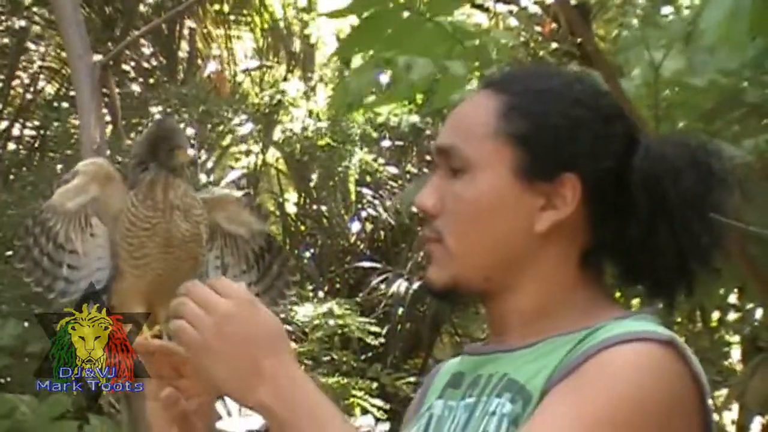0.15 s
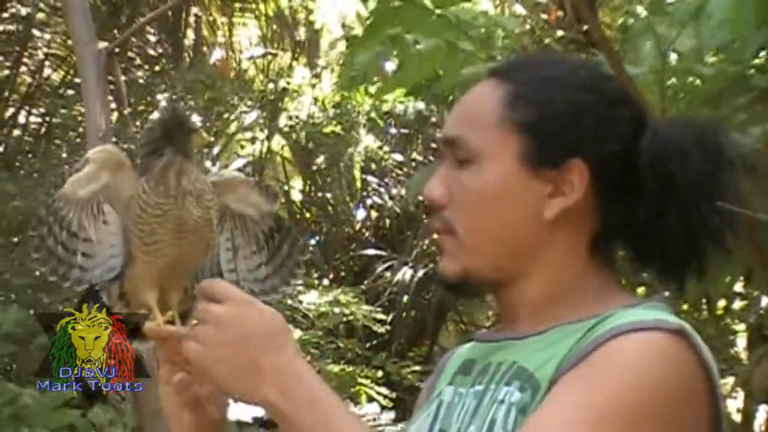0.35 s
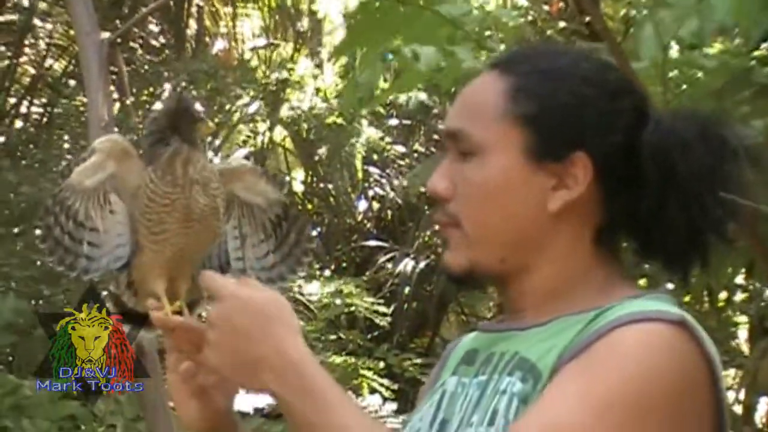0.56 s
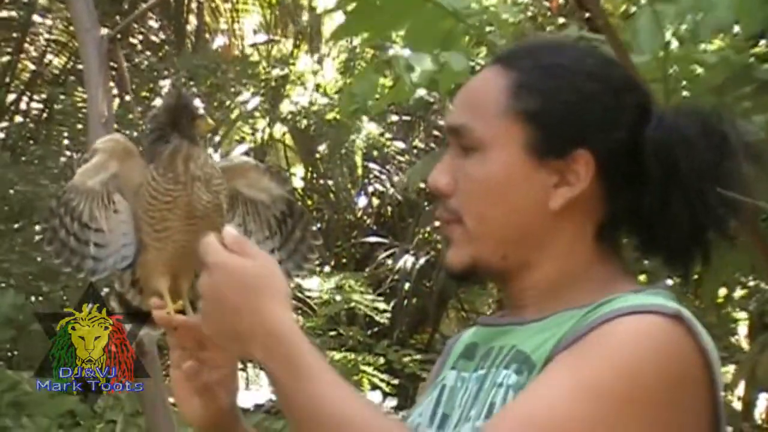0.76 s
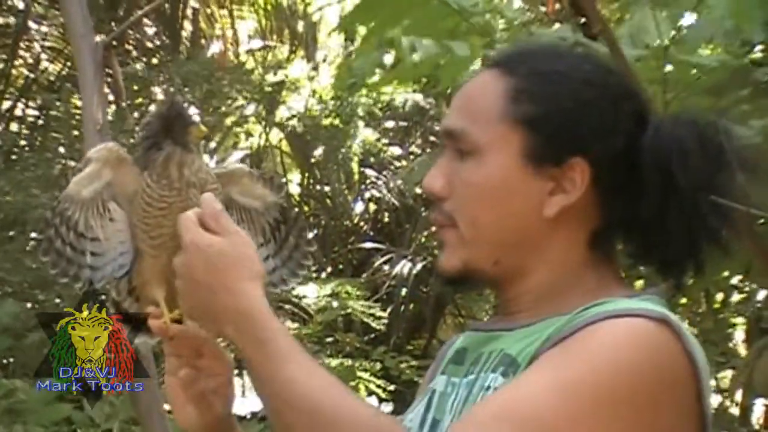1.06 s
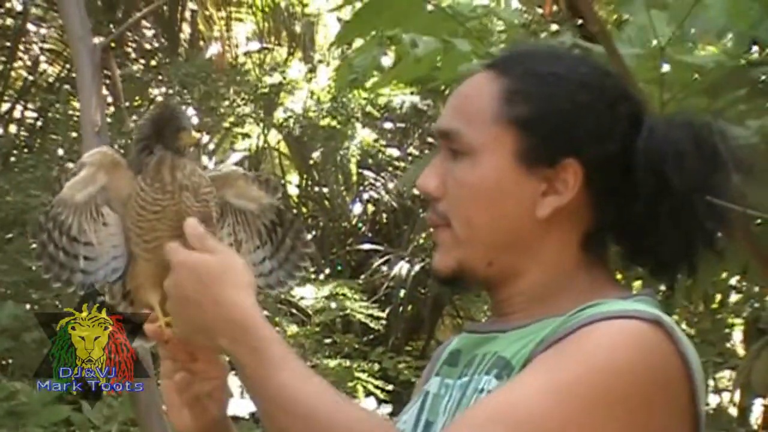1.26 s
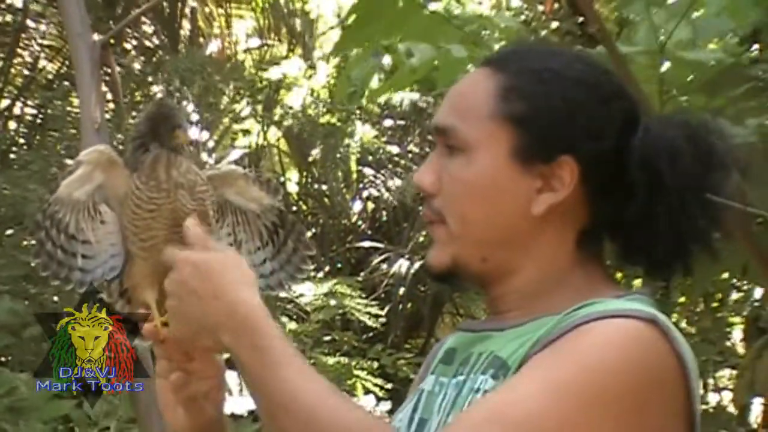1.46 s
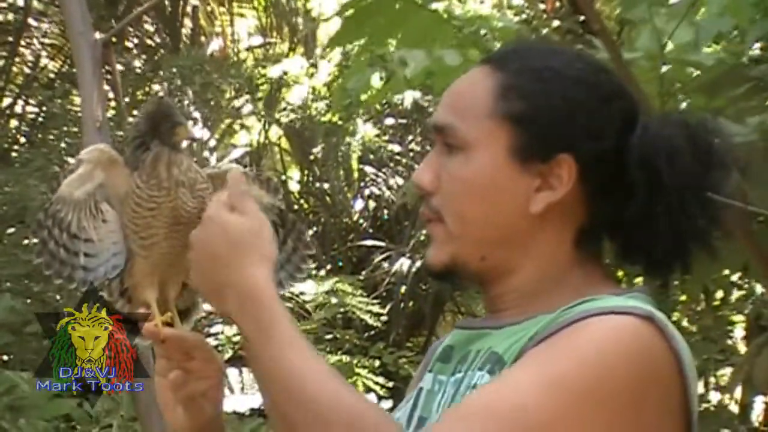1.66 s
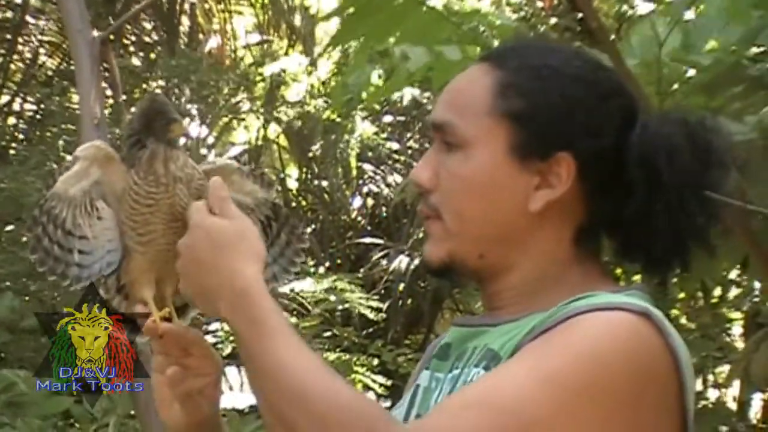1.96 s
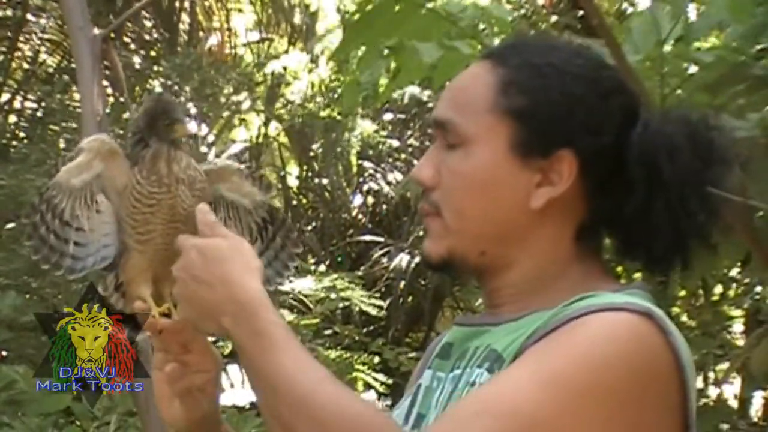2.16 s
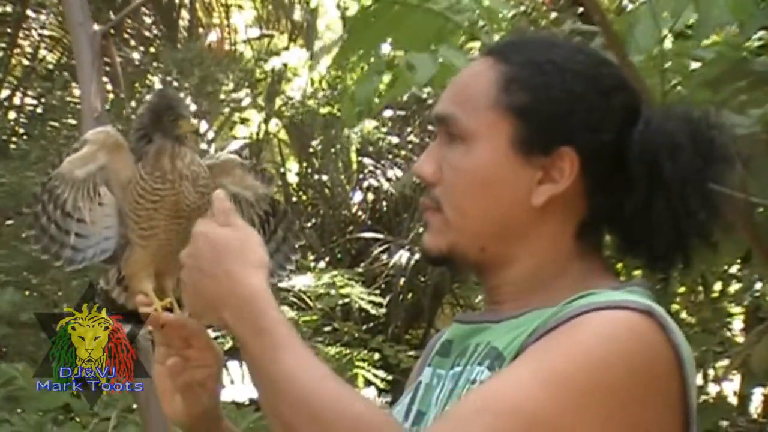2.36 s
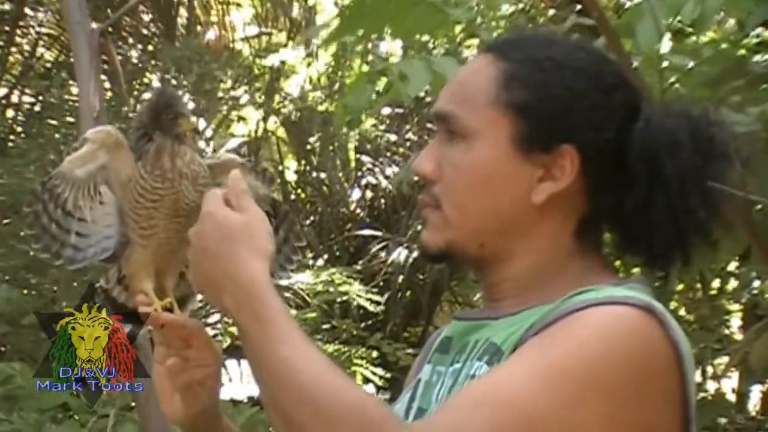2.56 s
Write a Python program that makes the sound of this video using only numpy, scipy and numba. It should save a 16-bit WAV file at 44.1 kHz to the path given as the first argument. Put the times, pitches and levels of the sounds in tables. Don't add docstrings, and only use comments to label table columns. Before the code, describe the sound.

One hoarse, piercing hawk scream drops in pitch over soft insect hiss and faint small birds

```python
import sys
import numpy as np
from scipy import signal
from scipy.fft import rfft, irfft
from scipy.io import wavfile
from scipy.ndimage import uniform_filter1d
from numba import njit

SR = 44100
rng = np.random.default_rng(int(sys.argv[2]) if len(sys.argv) > 2 else 0)


def level_to_linear(level):
    exponent = np.asarray(level, float) / 20
    return 10 ** exponent


def dump(signal):
    limited = np.clip(np.atleast_2d(signal).T, -1, 1)
    pcm = np.round(limited * 32767).astype(np.int16)
    wavfile.write(sys.argv[1], SR, pcm)


N = 119070
PORTS = np.array([[1], [-1]])


def level(x, db):
    return x * level_to_linear(db) / np.sqrt(np.mean(x ** 2))


def on_hz(table, hz):
    f, value = np.array(table).T[:2]
    return np.interp(np.log(hz + 1), np.log(f), value)


@njit
def svf(x, hz, width):
    y, b, l = np.empty(len(x)), 0., 0.
    for i in range(len(x)):
        g, k = np.tan(np.pi * hz[i] / SR), width / hz[i]
        v = (b + g * (x[i] - l)) / (1 + g * (g + k))
        b, l, y[i] = 2 * v - b, l + 2 * g * v, k * v
    return y


def band(x, hz, width):
    hz = hz + np.zeros(len(x))
    return svf(svf(x, hz, 1. * width), hz, 1. * width)


def walk(rate):
    k = max(int(SR / rate), 1)
    steps = np.repeat(rng.standard_normal(N // k + 1), k)
    return 1.44 * uniform_filter1d(uniform_filter1d(steps, k), k)[:N]


def bursts(table):
    out = np.zeros(N)
    for s, length, from_hz, to_hz, width, db in table:
        noise = rng.standard_normal(N // 8)
        a, n = max(int(s * SR), 0), int(length * SR)
        note = level(band(noise[:n], np.linspace(from_hz, to_hz, n), width), db)
        out[a:a + n] += note * np.sin(np.linspace(0, np.pi, n)) ** .7
    return out


# f/Hz, side to mid ratio/1
UNLIKE = [(60, 0.34), (130, 1), (300, 0.25), (1300, 0.35), (6000, 0.26), (9000, 0.61)]


def hiss(hz, width):
    f = np.fft.rfftfreq(N, 1 / SR)
    resonance = 1 + ((f - hz) * 2 / width) ** 2
    mid, side = irfft(rfft(rng.standard_normal((2, N))) / resonance, N)
    return mid + on_hz(UNLIKE, hz) * side * PORTS


# f/Hz, spectral level/dB
AIR = [(18, -65), (30, -22), (296, -17), (495, -5.5), (941, 1.5), (2200, -11), (7750, -13), (11700, -36),
       (14000, -79)]
# f/Hz, width/Hz, level/dB
INSECTS = [(3100, 1170, -51), (5285, 1020, -54), (7600, 1900, -50.5)]


def garden():
    swell = walk(1.8)
    air = 0
    for hz in 35 * 2 ** np.arange(0, 8.8, .5):
        flicker = 0.1 * swell + 1.04 * walk(9.16)
        air = air + level_to_linear(on_hz(AIR, hz) + flicker) * hiss(hz, hz * 0.58)
    insects = 0
    for hz, width, db in INSECTS:
        insects = insects + level_to_linear(0.91 * walk(8.5)) * level(hiss(hz, width), db)
    return level(air, -43) + insects


# t/s, length/s, start f/Hz, end f/Hz, width/Hz, level/dB
BUMPS = [
    (1.97, 0.11, 40, 35, 40, -61),
    (2.37, 0.15, 50, 40, 50, -57),
    (0.08, 0.135, 150, 105, 87, -63),
]


def hand_bumps():
    return bursts(BUMPS)


# t/s, length/s, start f/Hz, end f/Hz, width/Hz, level/dB
CHIRPS = [
    (0, 0.058, 6700, 7260, 3480, -42),
    (.06, 0.1, 7850, 7660, 300, -41),
    (.16, 0.078, 9140, 9300, 300, -52),
    (.29, 0.064, 9200, 6340, 1500, -40.5),
    (.3, .15, 8200, 7300, 2200, -53),
    (.46, 0.11, 7940, 7600, 500, -50.5),
    (.32, 0.051, 510, 503, 29.7, -48.5),
    (2.14, .14, 1013, 994, 40, -48.5),
    (2.14, 0.056, 816, 816, 40, -50),
]


def small_birds():
    return bursts(CHIRPS)


# t/s, f/Hz, level/dB
WHISTLE = [
    (1.16, 3404, -51),
    (1.201, 3713, -41),
    (1.24, 3803, -62),
    (1.285, 3770, -49),
    (1.399, 3200, -50.5),
    (1.449, 2990, -45.5),
    (1.51, 2960, -45),
    (1.6, 2740, -57),
    (1.64, 2620, -68),
]


def far_whistle(t):
    s, hz, db = np.array(WHISTLE).T
    pitch = uniform_filter1d(np.interp(t, s, hz), size=1200)
    strength = np.interp(t, s, db, -120, -120) + 2.5 * walk(35.4)
    return 1.6 * level_to_linear(strength) * np.sin(2 * np.pi * np.cumsum(pitch) / SR)


# t/s, length/s, start f/Hz, end f/Hz, width/Hz, level/dB
RASPS = [
    (1.845, 0.042, 2800, 3770, 497, -39),
    (1.88, 0.048, 2400, 4370, 2600, -39),
    (2.49, 0.049, 3300, 3100, 700, -34),
]


def hoarse_air():
    return bursts(RASPS)


def beak_click():
    after = np.clip(t_axis() - 1.8755, 0, 1)
    decay_s = .00008
    click = level_to_linear(-9) * (after > 0) * np.exp(-after / decay_s) * (1 + 0.35 * rng.standard_normal(N))
    low, middle, high = band(click, 1300., 1800.), band(click, 4000., 1500.), band(click, 11000., 11500.)
    return low + 0.83 * middle + 1.3 * high


def t_axis():
    return np.arange(N) / SR


# t/s, f/Hz, effort level/dB, breath share/dB, loss per harmonic as the beak closes/dB
SCREAM = [
    (1.862, 900, -39, -3, -1.5),
    (1.9, 1222, -34, -5, -2.5),
    (1.94, 1629, -17.5, -14.5, 2.5),
    (2.012, 1785, -18, -19, -0.7),
    (2.07, 1685, -20.5, -14, 2),
    (2.125, 1456, -22, -18, 0),
    (2.27, 1275, -28, -24.5, 0.1),
    (2.465, 1166, -27, -32, 4),
    (2.503, 1054, -28.5, -16, 0),
]
# t/s, length/s, level/dB
PUSHES = [
    (2.02, 0.0068, 0.5),
    (2.028, 0.0026, -4),
    (2.048, 0.0058, 2),
    (2.275, 0.0068, -2.5),
    (2.315, .018, 4.5),
    (2.349, 0.01, -6.5),
    (2.396, 0.02, 6.5),
    (2.416, 0.0042, -9),
    (2.467, 0.0051, -19),
    (2.475, .006, 8.5),
]


def syrinx(t):
    s, hz, db, breath_db, dull_db = np.array(SCREAM).T

    def smooth(values):
        return uniform_filter1d(np.interp(t, s, values), size=600)

    breath, closing = smooth(breath_db), smooth(dull_db)
    rough = np.clip(level_to_linear(breath + 16.5), .3, 1.2)
    pitch = smooth(hz) * (1 + 0.0038 * rough * walk(150))
    phase = 2 * np.pi * np.cumsum(pitch) / SR
    not_yet_full = np.clip((s[2] - t) / .05, 0, 1)
    voice = 0
    for k in range(1, 12):
        shimmer_db = 3.8 * rough * walk(140)
        beak_loss_db = max(k - 3, 0) * np.clip(closing, 0, 4)
        late_loss_db = 4.5 * max(k - 6, 0) * not_yet_full
        voice = voice + np.cos(k * phase) * level_to_linear(shimmer_db - beak_loss_db - late_loss_db)
    puffs = 1.8 * (1 + np.cos(phase))
    air = level_to_linear(breath) * puffs * rng.standard_normal(N)
    fade_s = 0.016
    gate = np.clip(np.minimum(t - s[0], s[-1] - t) / fade_s, 0, 1)
    push_db = sum(g * np.exp(-.5 * ((t - at) / length) ** 2) for at, length, g in PUSHES)
    return (voice + air) * gate * level_to_linear(smooth(db) + 0.5 + push_db), closing


# f/Hz, width/Hz, level/dB
THROAT = [(1263, 300, -17.5), (2600, 600, -19), (3340, 578, 0.66), (5130, 660, -19), (7470, 1090, -11),
          (8940, 920, -22.5), (10930, 2700, -26)]


def throat(source, closing):
    out = 0
    for k, (hz, width, db) in enumerate(THROAT):
        out = out + (-1) ** k * level_to_linear(db) * band(source, hz * (1 + 0.015 * closing), width * 1.284)
    return out


def hawk(t):
    return throat(*syrinx(t)) + beak_click() + hoarse_air()


def trees(x):
    t = np.arange(SR // 2) / SR
    t60_s, gap_s = 0.44, .012
    mid, side = rng.standard_normal((2, len(t))) * level_to_linear(-60 * t / t60_s) * (t > gap_s)

    def echo(response):
        return signal.fftconvolve(x, level(response, -4) / np.sqrt(len(t)))[:N]

    return x + echo(mid) + 0.24 * echo(side) * PORTS


def scene():
    t = t_axis()
    calls = hawk(t) + far_whistle(t) + small_birds()
    return trees(calls) + garden() + hand_bumps()


# f/Hz, level difference/dB
LEFT_DB = [(80, 2), (170, 12.5), (670, 7), (1220, 4.5), (4090, 3), (9000, 1.5)]
# f/Hz, phase/rad
LEADS = [(70, 2.6), (200, 1.0), (700, 0.33), (2000, 0.08), (6500, 0.09), (8500, -1.3), (13800, -0.5)]
# f/Hz, level/dB
MIC = [(30, -6), (70, 1), (150, 1), (9500, 0.5), (11500, -2), (12600, -4), (14500, -12)]


def two_ports(x):
    hz = np.fft.rfftfreq(N, 1 / SR)
    left = level_to_linear(on_hz(LEFT_DB, hz) / 2) * np.exp(.5j * on_hz(LEADS, hz))
    return irfft(rfft(x) * level_to_linear(on_hz(MIC, hz)) * np.array([left, 1 / left]), N)


def low_pass(x):
    return signal.sosfilt(signal.butter(12, 14250, fs=SR, output="sos"), x)


def record(dry):
    mix = two_ports(dry)
    return low_pass(mix)


dry = scene()
out = record(dry)
dump(out)
```